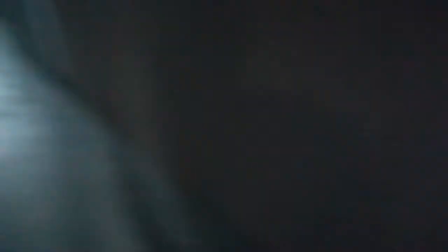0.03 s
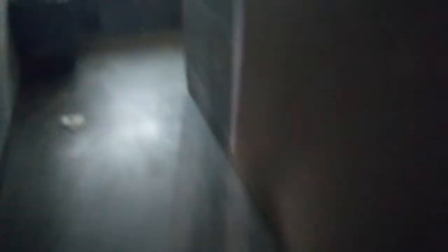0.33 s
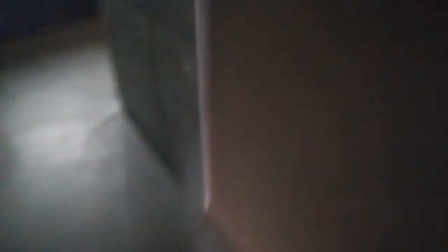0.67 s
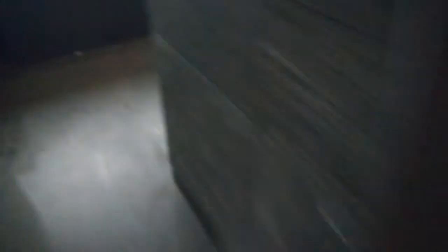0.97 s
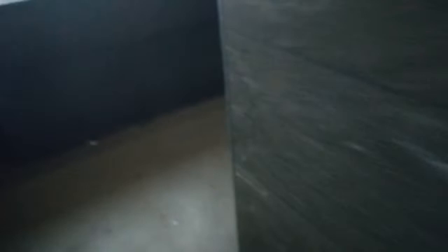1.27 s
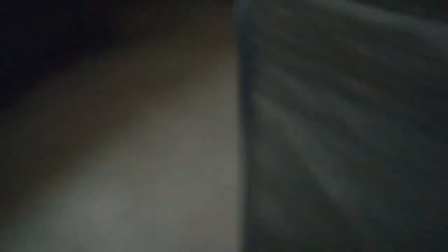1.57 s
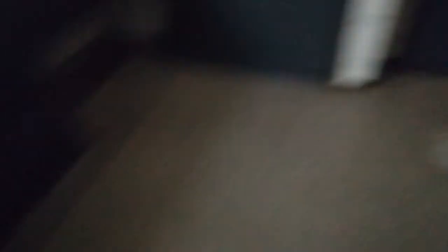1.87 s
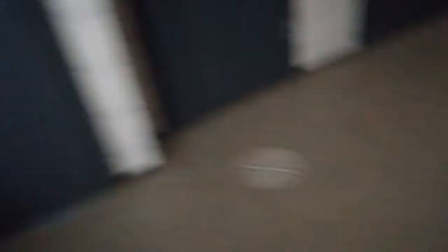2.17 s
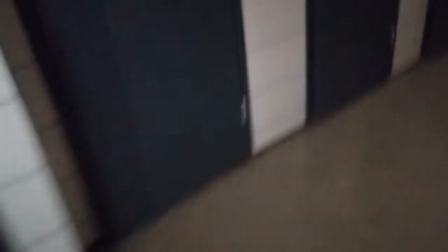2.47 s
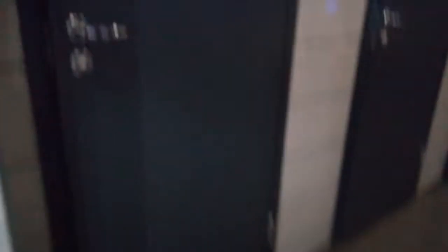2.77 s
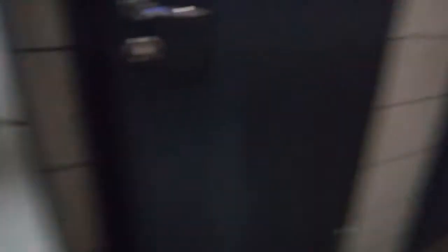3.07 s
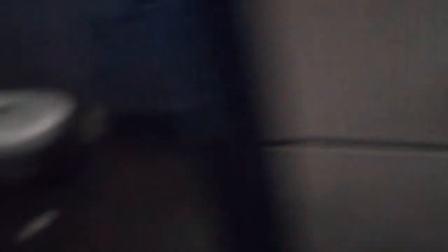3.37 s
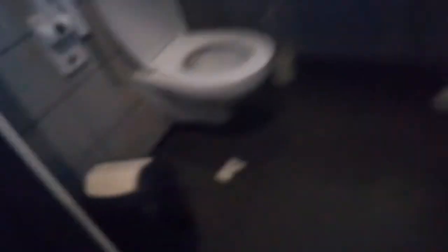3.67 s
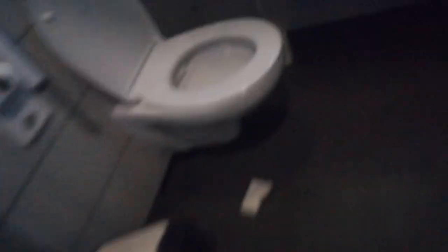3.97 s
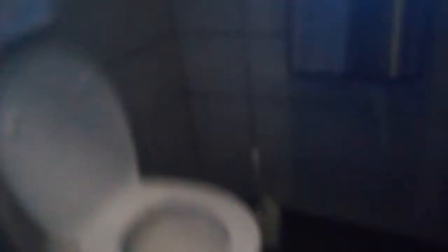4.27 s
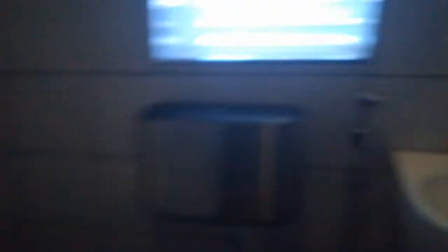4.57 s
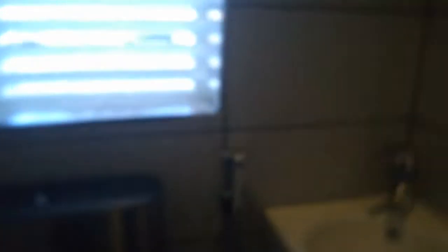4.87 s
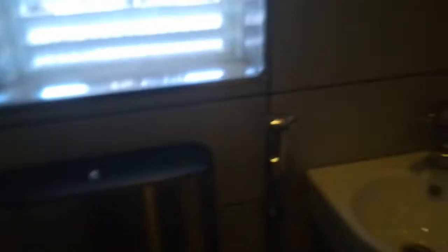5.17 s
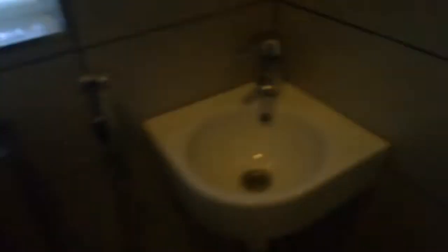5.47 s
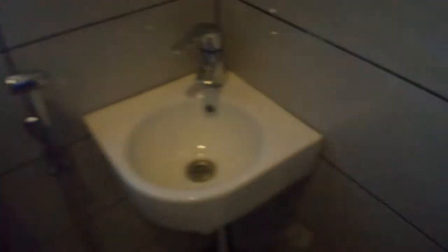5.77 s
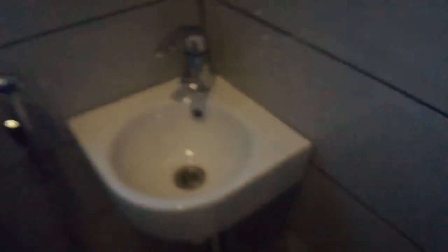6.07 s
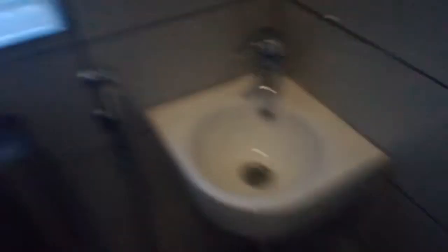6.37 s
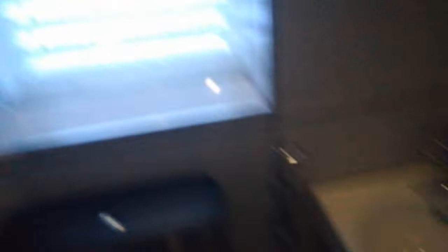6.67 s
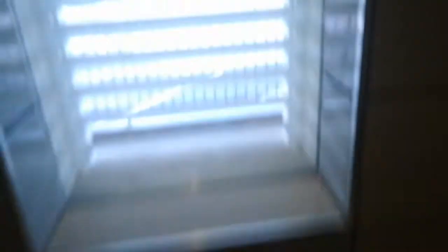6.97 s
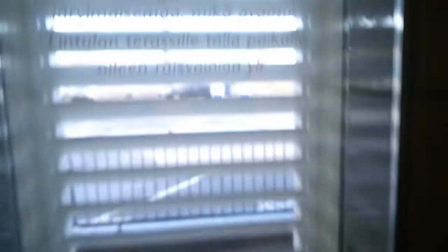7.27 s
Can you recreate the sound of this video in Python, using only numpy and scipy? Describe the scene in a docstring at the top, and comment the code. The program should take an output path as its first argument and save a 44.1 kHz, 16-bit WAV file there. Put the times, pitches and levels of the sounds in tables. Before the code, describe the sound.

Someone walks into a small restroom, knocks a door open with a metallic rattle and flushes the toilet, water gurgling and hissing.

```python
"""A flush in a tiled restroom

Someone walks in with a hand-held microphone: clothes swish, soles scuff and air buffets the ports.
A cubicle door scrapes and knocks, its latch clicks and its handle rings. The flush button clacks, the
valve gulps and the pipe booms; water then excites the air in the bowl and trap, and bubbles and spray
hiss above it. The hard walls reverberate after the knocks and drops, over room air and two low hums."""
import sys
import numpy as np
from scipy import signal
from scipy.fft import rfft, irfft, next_fast_len
from scipy.io import wavfile
from scipy.ndimage import uniform_filter1d, map_coordinates

SR = 44100
rng = np.random.default_rng(int(sys.argv[2]) if len(sys.argv) > 2 else 0)


def pcm_store(signal):
    """Save signal as 16-bit PCM."""
    levels = np.round(np.clip(np.atleast_2d(signal), -1, 1) * 32767)
    wavfile.write(sys.argv[1], SR, levels.astype(np.int16).T)


N = 322812
FLUSH_S = 5.22  # water reaches the bowl
# coherence of the room's sound field: f/Hz, left-right correlation
ROOM_COHERENCE = [(60, 1), (200, 1), (330, 0.78), (550, -0.42), (1200, 0.11), (4000, -0.031)]


def flush():
    """Superposition of the water sounds, panned by a level difference as the microphone turns."""
    # water slapping on the china: t/s, level/dB, centre f/Hz, decay time/s
    slaps = [(5.232, -33, 5130, 0.02), (5.303, -24.5, 2580, 0.04), (5.39, -34, 4220, .015),
             (5.47, -20.5, 3850, 0.022), (5.66, -35, 4800, 0.13)]
    # large air pockets bursting in the bowl: t/s, level/dB, centre f/Hz, decay time/s
    glugs = [(5.483, -22, 1239, 0.038), (6.08, -31.5, 2300, 0.06), (6.29, -36, 2380, 0.045),
             (6.658, -35, 1710, 0.055), (6.68, -33.5, 2660, 0.21), (7.02, -36, 2609, .05),
             (7.12, -36, 2500, 0.036), (7.24, -32.5, 2730, .088)]
    # the turn away from the bowl: t/s, left-right level difference/dB
    turn = [(5.2, -1), (5.7, 1), (6.2, -0.5), (6.7, -1), (7.3, -2.5)]
    water = bowl_and_trap() + backwash() + splashing()
    water += bursts(slaps, relative_width=3.1) + bursts(glugs, relative_width=0.16)
    return water * amp(curves(turn)[0] * np.array([[.5], [-.5]]))


def flow_db(layer):
    """Transient and steady flow: the level of a water layer starts high, then eases."""
    # by layer: steady level/dB, initial excess/dB, midpoint of easing t/s, easing time/s
    layers = {"roar": (-42.5, 3, 6, 0.9), "backwash": (-55.5, 17, 5.5, .12), "throat": (-42, 11, 6, 0.73),
              "splash": (-35.5, 6, 5.5, 0.4), "spray": (-40, 6, 6, 0.03), "mist": (-49, 4.5, 6, 0.2)}
    steady_db, excess_db, s, easing_s = layers[layer]
    return steady_db + excess_db * (1 - step(s, easing_s))


def bowl_and_trap():
    """Cavity resonance: rushing water makes the air in the bowl roar and the trap gurgle."""
    # modes of the air in the bowl: f/Hz, bandwidth/Hz, level/dB
    bowl_modes = [(259.6, 8.4, 4), (316.7, 51, 7), (344, 35, -11), (420, 17, -2.5)]
    # modes of the trap: f/Hz, bandwidth/Hz, level/dB
    trap_modes = [(577, 20, -3.5), (670, 22, 3), (739, 21, 4.5), (903, 30, -2.5)]
    age = np.maximum(clock() - FLUSH_S, 0)
    trapped_air_db = 19.5 * np.exp(-(age / 0.31) ** 2)  # adds to the roar until it is driven out
    roar = amp(flow_db("roar") + trapped_air_db + wobble(18)) * cavity(bowl_modes, 253, 453)
    roar *= 0.33 + 0.63 * step(5.42, 0.028)
    filling_db = -43.5 - 6.5 * age  # the trap quietens as it fills
    siphon_db = 9.5 * bell(6.03, 0.13)  # and gurgles harder as the siphon draws
    gurgle = amp(filling_db + siphon_db + 2.5 * wobble(14)) * cavity(trap_modes, 526, 970)
    return (roar + gurgle) * step(5.2, 0.011)


def backwash():
    """Flow noise: the outflow rumbles, and fades once the bowl is empty."""
    # outflow spectrum: f/Hz, level/dB
    spectrum = [(30, -14), (80, -3), (130, 7), (180, 1), (230, -11), (500, -45), (1000, -72)]
    drained_db = 9 * step(6.6, 0.11)
    return amp(flow_db("backwash") - drained_db) * coloured(white(), spectrum) * step(5.12, .02)


def splashing():
    """Bubble resonance in four bands: big bubbles ring low and long, fine drops high and short."""
    # spectrum of the big bubbles in the bowl's throat: f/Hz, level/dB
    throat_spectrum = [(400, -27), (520, -12), (640, -2.5), (830, -3), (950, -4), (1250, -4), (1550, -3.5),
                       (1900, 1), (3000, -33)]
    # spectrum of the small, splashing bubbles: f/Hz, level/dB
    splash_spectrum = [(900, -46), (1400, -6.5), (1800, -6.5), (2500, -3.5), (3200, -5), (3900, -6.5),
                       (5000, -14), (7000, -43)]
    # spectrum of the fine drops: f/Hz, level/dB
    spray_spectrum = [(2000, -19.5), (3200, -1), (4000, -2), (4800, -2.5), (6000, -6.5), (7500, -13.5),
                      (10000, -31), (15800, -50)]
    # spectrum of the mist, a plain hiss: f/Hz, level/dB
    mist_spectrum = [(4500, -27), (6500, 0), (7800, 0), (10000, -5), (13000, -11.5), (15800, -14.5)]
    big = bubbles(centre_hz=1252, scatter=0.254, cycles=14.3, size_db=4.5, count=1600)
    big = froth(big, drops_db=-1.5, direct_db=-8)
    small = bubbles(centre_hz=2398, scatter=0.271, cycles=23.0, size_db=3.5, count=2800)
    small = froth(small, drops_db=-2.0, direct_db=-7.5)
    fine = bubbles(centre_hz=6070, scatter=0.506, cycles=4.7, size_db=5.5, count=8000)
    fine = froth(fine, drops_db=-5.5, direct_db=-3.0)
    refill_db = 3 * bell(6.79, 0.064)  # a late swell of the jet from the rim
    shade_db = bell(6.13, 0.17)  # facing the basin shades the treble
    throat = amp(flow_db("throat") + 0.97 * wobble(22))
    throat = throat * coloured(clusters(big, depth_db=1.4), throat_spectrum)
    splash = amp(flow_db("splash") + refill_db + 0.96 * wobble(30))
    splash = splash * coloured(clusters(small, depth_db=0.86), splash_spectrum)
    spray = amp(flow_db("spray") + refill_db - shade_db + 0.65 * wobble(45))
    spray = spray * coloured(clusters(fine, depth_db=0.9), spray_spectrum)
    mist = amp(flow_db("mist") + refill_db - 7.5 * shade_db + 1.2 * wobble(50))
    mist = mist * coloured(clusters(white(), depth_db=1.5), mist_spectrum)
    return (throat + splash + spray + mist) * step(FLUSH_S, 0.014)


def bubbles(centre_hz, scatter, cycles, size_db, count):
    """Damped oscillators: each bubble or drop is a short rising chirp of random size."""
    when, pitch, size = rng.random(count), rng.standard_normal(count), rng.exponential(size=count)
    hz = np.clip(centre_hz * np.exp(scatter * pitch), 300, SR / 3)[:, None]
    k = np.arange(SR // 100)
    age = hz * k / SR / cycles
    envelope = amp(size_db * np.minimum(size, 4))[:, None] * np.exp(-2 * age)
    rings = envelope * np.sin(2 * np.pi * cycles * age * (1 + 0.045 * np.minimum(age, 2)))
    samples = (when * N).astype(int)[:, None] + k
    return unit(np.bincount(samples.ravel(), rings.ravel(), N)[:N])


def froth(drops, drops_db, direct_db):
    """Direct and reverberant sound of drops in hiss; the echoes change as the microphone moves."""
    # three patterns of echoes take turns every 0.7 s
    turns = np.maximum(np.cos(2 * np.pi * (clock() / .7 + np.arange(3)[:, None] / 3)), 0)
    walls = sum(reverberation(drops * share) for share in turns / np.linalg.norm(turns, axis=0))
    direct = np.array([drops, np.roll(drops, SR // 4000)])
    return white() + amp(drops_db) * (walls + amp(direct_db) * direct)


def clusters(pair, depth_db):
    """Spectral modulation: clusters of bubbles favour now one pitch, now another."""
    z = signal.stft(pair, nperseg=1024)[2]
    field = uniform_filter1d(rng.standard_normal(z.shape[1:]), size=5, axis=0)
    field = uniform_filter1d(field, size=6, axis=1)
    return signal.istft(z * amp(depth_db * field / field.std()), nperseg=1024)[1][:, :N]


def bursts(rows, relative_width):
    """Exponential decay: sudden splashes of noise die away, each around its own pitch."""
    return sum(amp(db) * step(s, 0.0015) * np.exp(-np.abs(clock() - s) / decay)
               * hiss(hz, relative_width * hz) for s, db, hz, decay in rows)


def pipe(resonance_hz=299):
    """Pipe resonance: slugs of air and water make the flush pipe boom at one pitch."""
    # surges through the pipe: t/s, level/dB, half-length/s
    surges = [(5.124, -33, 0.014), (5.184, -12.5, 0.013), (5.22, -22.5, 0.019), (5.289, -20.5, 0.016),
              (5.333, -18.5, 0.011), (5.372, -17.5, .007), (5.412, -19.5, .008)]
    out = np.zeros(N)
    for s, db, half in surges:
        t = clock() - s
        envelope = amp(db) * np.exp(-np.abs(t / half) ** 2.05 / 2)
        out += envelope * np.sin(2 * np.pi * (resonance_hz * t + rng.random()))
    return out


def valve():
    """Throttled flow: the first water excites the valve's resonances in hollow gulps over a trickle."""
    # modes of the valve: f/Hz, bandwidth/Hz, level/dB
    modes = [(615, 78, 0.5), (696, 68, 0), (1820, 110, -2), (2410, 120, 2.5), (2940, 140, -21),
             (5030, 3500, -25)]
    # water squeezing through: t/s, level/dB, half-length/s
    gulps = [(5.07, -38.5, 0.02), (5.195, -29.5, 0.015), (5.228, -35, 0.012)]
    hollow = filtered(white(), lambda f: resonances(modes, f) * band(450, 7000, f))
    trickle = amp(-52.5) * step(gulps[0][0], .02)
    return np.hypot(swells(gulps), trickle) * amp(1.4 * wobble(70)) * unit(hollow)


def knocks():
    """Impact excitation: each contact cracks, thuds in a hollow panel and sets the room ringing."""
    # contacts: t/s, timbre, direct level/dB, room level/dB, thud level/dB
    # A timbre names a kind of sound: "handle" is any bright click, "door" any broad knock.
    # The flush button clicks at 4.850 s; the valve knocks at 5.051 s and ticks at 5.111 s.
    contacts = [(1.231, "heel", -54, -44, -40), (1.669, "floor", -31, -32, -27.5),
                (2.007, "floor", -45, -40.5, -44.5), (2.896, "handle", -54, -46, -60),
                (2.925, "door", -53, -54, -39), (2.950, "door", -45, -32.5, -27),
                (2.981, "handle", -40.5, -34.5, -37), (2.992, "handle", -37, -43, -38),
                (3.312, "handle", -38, -33, -69), (3.328, "latch", -26.5, -30, -55),
                (3.331, "spring", -41, -43, -60), (3.332, "door", -52, -30.5, -70),
                (4.717, "plate", -48, -43, -43), (4.850, "handle", -50, -32, -51),
                (4.851, "spring", -54, -45, -60), (4.852, "button", -49, -29, -39),
                (4.934, "door", -49, -49, -43), (5.051, "door", -49, -36, -29),
                (5.067, "valve", -43, -40, -49), (5.111, "handle", -58, -42.5, -49),
                (5.187, "valve", -35, -37, -25)]
    # by timbre: lowest f/Hz, highest f/Hz, ringing f/Hz, left-right level difference/dB
    timbres = {"heel": (502, 1100, 797, 2), "floor": (652, 2050, 1882, -10), "door": (652, 4000, 2005, 1),
               "handle": (2300, 8000, 4230, 6), "latch": (3360, 6600, 4600, 9),
               "spring": (8300, 13000, 7600, 5), "plate": (470, 2660, 900, 9),
               "button": (730, 2900, 1860, 2), "valve": (2148, 2900, 2470, -1)}
    # modes of the hollow panel: f/Hz, bandwidth/Hz, level/dB
    panel_modes = [(265, 80, 8.5), (372, 65, -5), (800, 660, -6)]
    out, size = np.zeros((2, N + 2 * SR)), 4096
    f = np.fft.rfftfreq(size, 1 / SR)
    thud = impulse(resonances(panel_modes, f) * band(89.5, 670, f))
    for s, timbre, direct_db, room_db, thud_db in contacts:
        low_hz, high_hz, hz, lean_db = timbres[timbre]
        crack = band(low_hz, high_hz, f, order=5)
        snap = impulse(crack * (0.32 + resonances([(hz, 0.084 * hz, 0)], f)))
        ring = impulse(crack * (1 + resonances([(hz, 0.077 * hz, 3)], f)))
        echoes = reverberation(amp(room_db) * ring + amp(thud_db) * thud)
        sound = spread(echoes, ROOM_COHERENCE)[:, :SR]
        pan = amp([[lean_db / 2], [-lean_db / 2]])
        sound[:, :size] += amp(direct_db) * snap * pan + amp(thud_db - 9.0) * thud
        out[:, round(s * SR):][:, :SR] += sound
    return out[:, :N]


def handle():
    """Free vibration: the door's metal handle rings in damped modes after each shake."""
    # shakes: t/s, level/dB
    shakes = [(2.981, -42), (3.012, -43), (3.328, -47)]
    # modes of the handle: f/Hz, level/dB, T60/s
    modes = [(2697, -3, .5), (3350, 3.5, 0.75), (3550, -2, 0.59), (4350, 0, 0.44), (4740, -2, 0.51),
             (12300, -16, .17)]
    out = np.zeros((2, N))
    t = np.arange(SR // 2) / SR
    for s, db in shakes:
        for hz, mode_db, t60 in modes:
            tone = np.sin(2 * np.pi * (hz * t + rng.random((2, 1))))
            out[:, round(s * SR):][:, :len(t)] += amp(db + mode_db - 60 * t / t60) * tone
    return out * (0.88 + 0.68 * wobble(100))  # the loose handle rattles as it rings


def door():
    """Sliding friction: the cubicle door scrapes while pushed, then coasts."""
    # scrape spectrum: f/Hz, level/dB
    spectrum = [(100, 4.5), (170, 3.5), (300, 13.5), (480, 2.5), (1200, -1), (2500, -7), (4000, -5.5),
                (6000, -20.5), (15000, -44)]
    push = held(2.976, 3.08, rise_db_per_s=140, fall_db_per_s=50)
    return push * amp(-34.5 + 2.6 * wobble(45)) * coloured(white(), spectrum)


def buffeting():
    """Turbulence: air rumbles on the microphone ports; hard gusts break into eddies and crackle."""
    # air pushed by each stride or swing of the arm: t/s, level/dB, half-length/s
    gusts = [(0.14, -39.5, 0.075), (0.37, -41.5, 0.045), (0.57, -35.5, 0.076), (1.0, -31, 0.1),
             (1.22, -32, 0.063), (1.44, -39.5, 0.077), (1.835, -34, 0.016), (2.21, -48.5, 0.067),
             (2.72, -38.5, .04), (3.07, -45.5, 0.11), (3.52, -33, 0.053), (3.78, -37, 0.11),
             (3.97, -30, 0.095), (4.3, -28, 0.034), (4.425, -21, 0.06), (4.585, -24, 0.046),
             (4.945, -31, 0.017), (5.075, -25, 0.017), (5.5, -38.5, 0.084), (6.28, -40, 0.026)]
    # sudden jolts of air: t/s, relative rumble level/dB, relative crackle level/dB
    puffs = [(0.268, -22, -60), (0.441, -21.5, -54), (0.549, -17, -53), (1.17, -17, -52),
             (1.198, -13.5, -53), (3.446, -13.5, -54), (3.883, -20, -41), (3.907, -16, -39.5),
             (4.253, -17.5, -37), (4.372, -22, -34.5), (4.392, -21, -28), (4.419, -18, -26.5),
             (4.476, -24, -36.5), (4.523, -18, -35), (4.562, -16, -34)]
    # rumble spectrum: f/Hz, level/dB
    rumble_spectrum = [(15, -18), (45, 1.5), (130, 0.5), (200, -6), (300, -15), (500, -26.5), (1000, -75)]
    # eddy spectrum: f/Hz, level/dB
    eddy_spectrum = [(60, -22), (200, -1), (350, 2), (600, -7), (1200, -17.5), (1700, -29), (2300, -39),
                     (4000, -74)]
    # coherence of the air on the two ports: f/Hz, left-right correlation
    coherence = [(50, 1), (150, 0.69), (280, 0.27), (550, -0.88), (1500, 0.26)]
    blow = np.hypot(amp(-57.5), swells(gusts))  # a faint draught remains between gusts
    push, crackle = np.zeros(N), np.zeros(N)
    for s, db, crackle_db in puffs:
        jolt = np.exp(-((clock() - s - .003) / 0.0062) ** 2)
        push += amp(db - 7.5) * jolt
        crackle += amp(crackle_db + 7.0) * jolt
    rumble = np.hypot(blow, push) * coloured(white(), rumble_spectrum, coherence)
    eddy_gain = amp(-6) * blow * np.minimum(blow / amp(-19.5), 1.5) ** 1.58 * amp(2.9 * wobble(130))
    eddies = np.hypot(eddy_gain, crackle) * coloured(white(), eddy_spectrum, coherence)
    return rumble + eddies * amp([[-5], [3]])


def soles():
    """Friction noise: soles scuff the floor in short hisses topped with grit."""
    # scuffs: t/s, level/dB, centre f/Hz, half-length/s
    scuffs = [(0.366, -60.5, 4400, 0.055), (0.864, -58.5, 4500, 0.03), (1.297, -60.5, 4340, 0.052),
              (1.325, -55.5, 1500, 0.032), (1.26, -58, 800, .02), (1.739, -53, 4800, 0.048),
              (1.962, -51, 1780, 0.023), (2.022, -59, 4470, 0.076), (3.53, -47.5, 2410, 0.017),
              (3.697, -64.5, 6000, 0.038), (4.21, -57, 2980, 0.048), (4.27, -63.5, 5800, 0.13)]
    rub = sum(amp(db) * bell(s, half) * hiss(hz, 2.3 * hz) for s, db, hz, half in scuffs)
    grit = amp(-20) * swells([(s, db, half) for s, db, hz, half in scuffs]) * hiss(11640, 9000)
    return (rub + grit) * amp(1.9 * wobble(150))


def clothes(stands_still_s=5.6):
    """Friction noise: cloth swishes with the strides until the walker stands still."""
    # sweeps of cloth: t/s, level/dB, half-length/s
    sweeps = [(.36, -56, 0.1), (.92, -57.5, 0.075), (2.18, -60.5, .16), (3.36, -44.5, 0.083),
              (3.6, -56, 0.26), (4.3, -55.5, 0.18)]
    # cloth spectrum: f/Hz, level/dB
    spectrum = [(400, -22), (1000, 2.5), (2200, 3), (4500, 1), (7000, -11), (10000, -18), (15000, -32)]
    swish = np.hypot(amp(-63.5) * (1 - step(stands_still_s, .05)), swells(sweeps))
    return swish * amp(0.21 * wobble(40)) * coloured(white(), spectrum)


def reverberation(x):
    """Diffuse reflection of a mono sound by the tiled walls; the treble dies first."""
    # reverberation time of the room: f/Hz, T60/s
    decay_times = [(100, 0.58), (300, 0.8), (1000, 0.63), (3000, 0.69), (6000, 0.54), (12000, 0.24)]
    hz, t, z = signal.stft(rng.standard_normal((2, SR)), SR, nperseg=256)
    tail = signal.istft(z * amp(-60 * t / along(decay_times, hz)[:, None]), SR, nperseg=256)[1]
    return signal.fftconvolve(x[None], tail / np.linalg.norm(tail[0]), axes=1)[:, :N]


def hums():
    """Amplitude and phase modulation: two low hums, perhaps ventilation, waver, swell and fade."""
    def tone(db, hz):
        return amp(db + 2.1 * wobble(17)) * np.sin(2 * np.pi * hz * clock() + .5 * wobble(12))
    passage = tone(db=-41.0, hz=201.3) * held(1.5, 1.49, rise_db_per_s=12, fall_db_per_s=47)
    cubicle = tone(db=-38.5, hz=125.2) * held(3.31, 4.06, rise_db_per_s=95, fall_db_per_s=42)
    return passage + cubicle


def room_air():
    """Stationary noise: the room's air is a steady, mostly low background."""
    # background spectrum: f/Hz, level/dB
    spectrum = [(15, -43), (25, 4), (64, 2.5), (170, -25.5), (205, -6.5), (299, -12.5), (403, -9),
                (513, -12), (557, -14), (1250, -17.5), (1680, -19), (2590, -21.5), (15800, -45.5)]
    return amp(-51.5) * coloured(white(), spectrum)


def amp(db):
    """Amplitude ratio of a level in decibels."""
    return 10 ** (np.asarray(db) / 20)


def unit(x):
    """Normalisation to rms 1 in the mean of the channels."""
    return x / np.sqrt(np.mean(np.atleast_2d(x).mean(axis=0) ** 2) + 1e-20)


def along(points, hz):
    """Interpolation of (f/Hz, value) points on a logarithmic frequency axis."""
    f, v = np.transpose(points)
    return np.interp(np.log(hz + 1), np.log(f + 1), v)


def clock():
    """Sample times in seconds."""
    return np.arange(N) / SR


def curves(rows):
    """Linear interpolation of each column after the time, one value per sample."""
    s, *cols = np.transpose(rows)
    return [np.interp(clock(), s, c) for c in cols]


def step(s, rise):
    """A smooth step from 0 to 1 around time s."""
    return .5 + .5 * np.tanh((clock() - s) / rise)


def bell(s, half):
    """A Gaussian of height 1 at time s; the half-length is its standard deviation."""
    return np.exp(-((clock() - s) / half) ** 2 / 2)


def swells(rows):
    """Incoherent addition: (t/s, level/dB, half-length/s) swells sum in power to one gain."""
    return np.sqrt(sum((amp(db) * bell(s, half)) ** 2 for s, db, half in rows))


def held(start, stop, rise_db_per_s, fall_db_per_s):
    """A gain with exponential growth until start and exponential decay after stop."""
    rise_db = rise_db_per_s * np.maximum(start - clock(), 0)
    fall_db = fall_db_per_s * np.maximum(clock() - stop, 0)
    return amp(-rise_db - fall_db)


def wobble(rate):
    """Random modulation: a smooth curve with rate knots a second."""
    return map_coordinates(rng.standard_normal(int(N * rate / SR) + 4), [clock() * rate])


def filtered(x, response):
    """Linear filtering: the spectrum of x times a complex frequency response."""
    m = next_fast_len(N + SR // 2)
    return irfft(rfft(x, m) * response(np.fft.rfftfreq(m, 1 / SR)), m)[..., :N]


def resonances(modes, f):
    """Modal superposition: the causal response of (f/Hz, bandwidth/Hz, level/dB) modes."""
    return sum(amp(db) * 1j * f * w / (c * c - f * f + 1j * f * w) for c, w, db in modes)


def band(low_hz, high_hz, f, order=4):
    """Causal band-pass response with steep skirts."""
    skirt = lambda s: 1 / np.polyval(signal.butter(order, 1, analog=True)[1], s)
    return skirt(1j * f / high_hz) * skirt(low_hz / (1j * f + 1e-6))


def impulse(response):
    """Impulse response with the energy of 10 ms at rms 1."""
    pulse = irfft(response)
    return pulse / np.linalg.norm(pulse) * np.sqrt(SR / 100)


def spread(pair, coherence):
    """Mid-side mixing: two independent signals become left and right of the given correlation."""
    angle = lambda hz: np.arccos(np.clip(along(coherence, hz), -1, 1)) / 2
    mid, side = filtered(pair, lambda hz: np.array([np.cos(angle(hz)), np.sin(angle(hz))]))
    return np.array([mid + side, mid - side])


def white():
    """Two independent white noises."""
    return rng.standard_normal((2, N))


def coloured(pair, spectrum, coherence=ROOM_COHERENCE):
    """Spectral shaping of a pair of signals into stereo of rms 1."""
    return unit(spread(filtered(pair, lambda hz: amp(along(spectrum, hz))), coherence))


def hiss(hz, width_hz):
    """Stereo noise of rms 1 around one resonance."""
    return unit(filtered(white(), lambda f: resonances([(hz, width_hz, 0)], f) * band(hz / 2, hz * 1.43, f)))


def cavity(modes, low_hz, high_hz):
    """Forced vibration: noise drives the modes of a hollow, giving stereo of rms 1."""
    ringing = filtered(white(), lambda f: resonances(modes, f) * band(low_hz, high_hz, f))
    return unit(spread(ringing, ROOM_COHERENCE))


def scene():
    """Superposition: the room's sounds reach two ports of slightly different colour; buffeting adds."""
    # colour of the ports: f/Hz, left-right level difference/dB
    imbalance = [(300, 0.5), (650, 4), (1200, -1), (2500, -1.5), (4500, 7), (8000, 2.5), (13000, -4.5)]
    ports = lambda hz: amp(np.array([along(imbalance, hz), -along(imbalance, hz)]) / 2)
    sound = room_air() + clothes() + soles() + door() + hums()
    sound += knocks() + handle() + valve() + pipe() + flush()
    return filtered(sound, ports) + buffeting()


def record(dry):
    """Band limiting: an ideal low-pass removes everything above 15850 Hz."""
    return filtered(dry, lambda hz: hz < 15850)


dry = scene()
out = record(dry)
pcm_store(out)
```